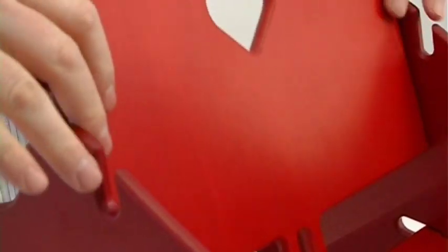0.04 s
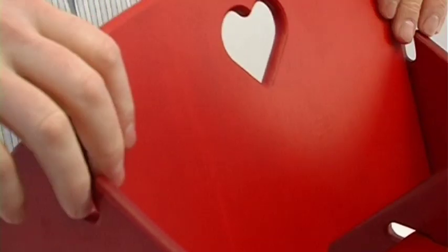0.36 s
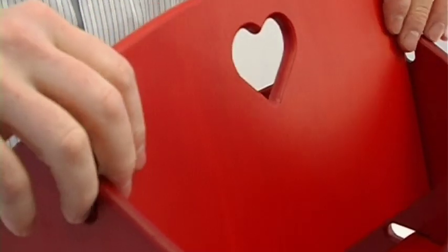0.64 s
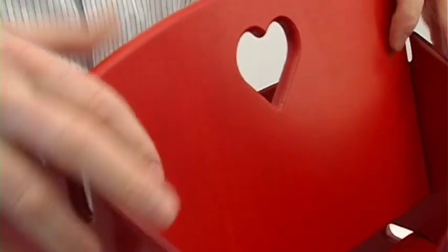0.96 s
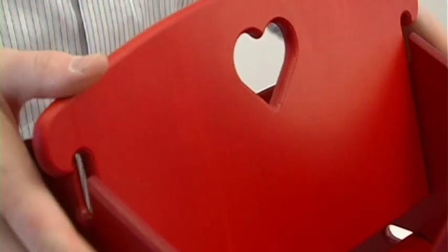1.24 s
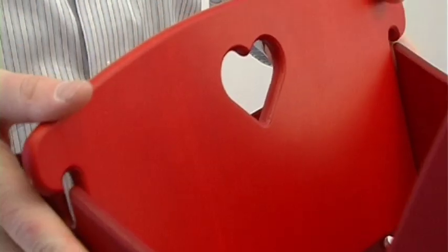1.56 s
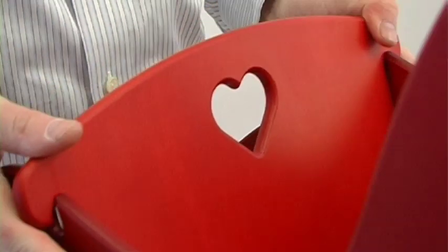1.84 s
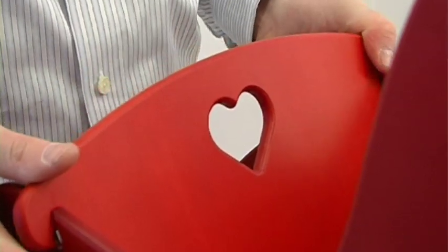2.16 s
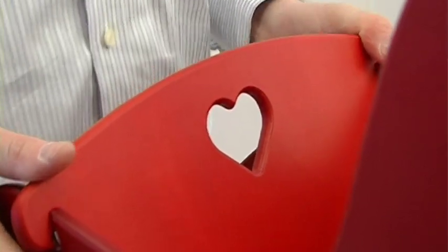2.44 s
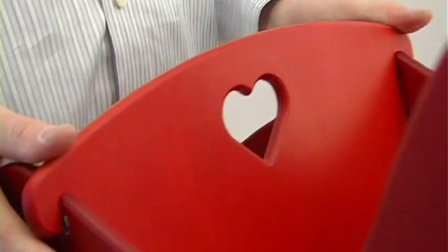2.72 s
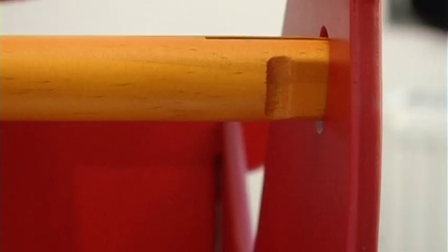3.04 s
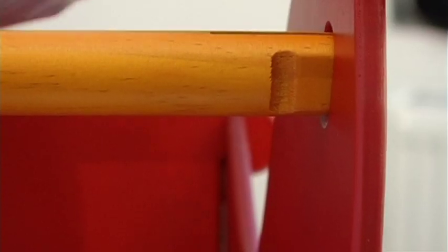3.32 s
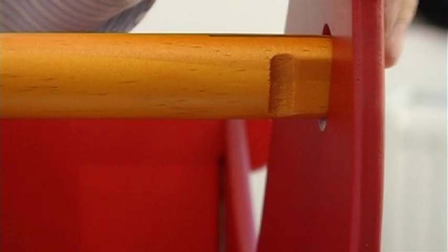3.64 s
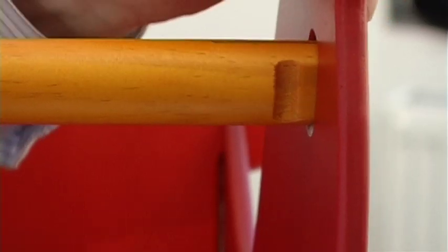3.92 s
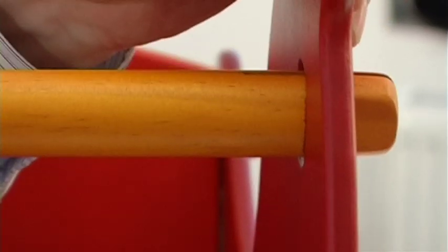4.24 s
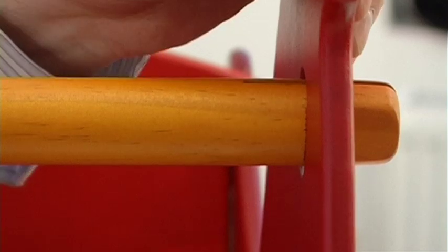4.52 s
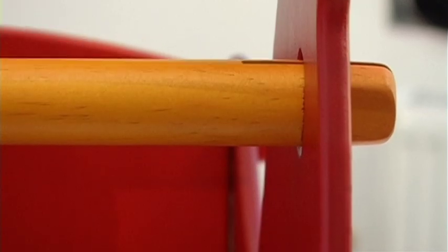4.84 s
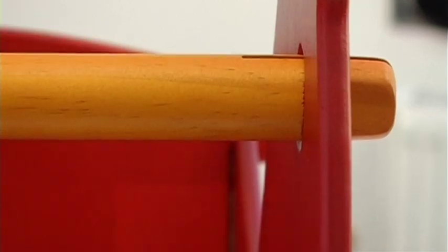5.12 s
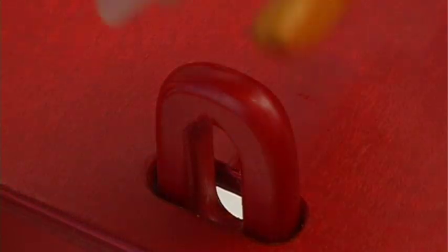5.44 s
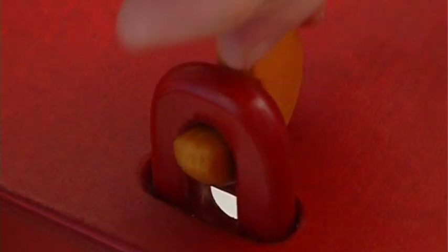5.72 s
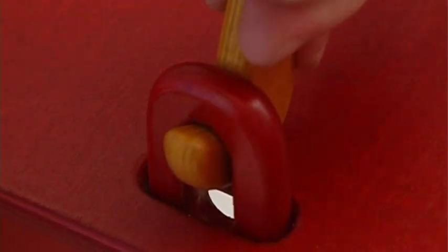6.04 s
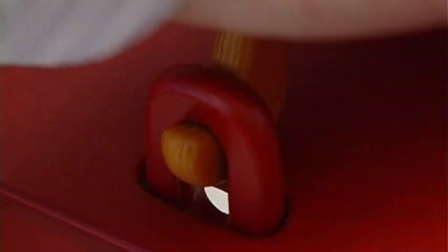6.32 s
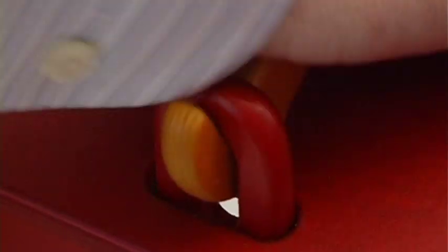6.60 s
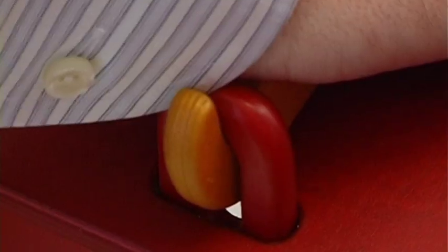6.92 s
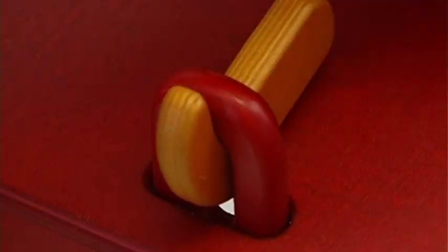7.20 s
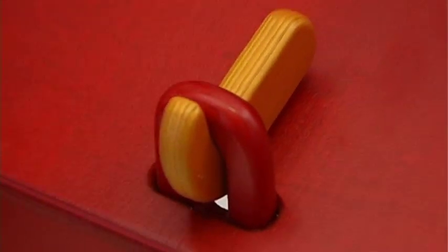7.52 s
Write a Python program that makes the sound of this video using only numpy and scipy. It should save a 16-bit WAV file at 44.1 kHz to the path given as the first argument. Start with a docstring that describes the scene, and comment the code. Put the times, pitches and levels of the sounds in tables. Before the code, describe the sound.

Wooden furniture is fitted together by hand, close to the microphone in a small, quiet room with faint hiss and hum. Soft sliding opens, then a double knock comes at about 0.6 seconds and light panel taps follow between 1 and 1.4 seconds. At 1.7 seconds slotted panels meet with a short scrape and a hollow, briefly ringing knock. Quiet rubbing and a faint low rocking continue to about 3 seconds. Small taps and clicks from 3.7 seconds lead to the loudest sound at 4.1 seconds, a hard, slightly overloaded crack as a dowel is knocked through. A faint tap follows at 4.7 seconds. A wedge goes in with two knocks around 5.6 seconds, then light taps and scrapes until 6.2. It jams home with a loud, sharp snap at 6.6 seconds. Soft rubbing and a couple of small clicks trail off by 8 seconds.

```python
"""Knocks on painted plywood, as furniture is put together by hand in a small, quiet room.
Slotted panels tap together, a dowel is knocked through, and a wedge is set and pressed home: each
impact excites the damped modes of the part, the joined boards and the bench. Between blows, sliding
wood rubs and hisses, edges click and the assembly rocks, over faint room noise and hum.
The loudest blow overloads the close microphone."""
import sys
import numpy as np
from scipy import signal
from scipy.fft import rfft, irfft, next_fast_len
from scipy.io import wavfile
from scipy.ndimage import uniform_filter1d

SR = 44100
rng = np.random.default_rng(int(sys.argv[2]) if len(sys.argv) > 2 else 0)


def log_audio(samples):
    """Write samples as a 16-bit WAV file to the path given in sys.argv[1]."""
    # one column per channel
    frames = np.atleast_2d(samples).T
    # limit to full scale, then quantise
    limited = np.clip(frames, -1, 1)
    pcm = np.round(limited * 32767).astype(np.int16)
    wavfile.write(sys.argv[1], SR, pcm)


N = 342216
CLOCK = np.arange(N) / SR  # seconds through the scene
T = np.arange(int(.7 * SR)) / SR  # seconds through one event

# spectrum of the crack of wood on wood: frequency_hz, density_db
CRACK_SPECTRUM = [(900, -16.5), (1900, -2), (3200, -1.5), (4300, -10.5), (6000, -1), (8000, -16),
                  (15000, -18.5)]


def amp(db):
    """Amplitude ratio of a level in decibels."""
    return 10 ** (np.asarray(db) / 20)


def unit(x):
    """Normalisation to rms 1."""
    return x / np.sqrt(np.mean(x ** 2) + 1e-20)


def crest(x):
    """Normalisation to peak 1."""
    return x / (np.abs(x).max() + 1e-12)


def along(points, hz):
    """Interpolation on a logarithmic frequency axis."""
    f, v = np.transpose(points)
    return np.interp(np.log(hz + 1), np.log(f), v)


def filtered(x, response):
    """Linear filtering: the spectrum times a frequency response."""
    n = x.shape[-1]
    m = next_fast_len(n + 8192)
    return irfft(rfft(x, m) * response(np.fft.rfftfreq(m, 1 / SR)), m)[..., :n]


def coloured(x, spectrum):
    """Spectral shaping, at rms 1."""
    return unit(filtered(x, lambda hz: amp(along(spectrum, hz))))


def rolled_off(x, hz, kind):
    """A causal second-order low-pass or high-pass."""
    return signal.sosfilt(signal.butter(2, hz, kind, fs=SR, output="sos"), x)


def resonance(hz, centre_hz, width_hz):
    """Frequency response of a driven, damped oscillator."""
    return 1j * hz * width_hz / (centre_hz ** 2 - hz ** 2 + 1j * hz * width_hz)


def add(track, start_s, sound):
    """Superposition of a sound on a track."""
    i = max(round(start_s * SR), 0)
    track[..., i:i + sound.shape[-1]] += sound[..., :N - i]


def fade(t60):
    """Exponential decay of 60 dB in t60 seconds."""
    return np.exp(-np.log(1000) * T / t60)


def swells(rows):
    """Incoherent addition: envelopes that rise and fall 20 dB in the given times sum in power."""
    return np.sqrt(sum(amp(db - 20 * np.maximum((s - CLOCK) / rise, (CLOCK - s) / fall)) ** 2
                       for s, db, rise, fall in rows))


def diffuse(size):
    """Diffuse-field noise: two close capsules are coherent only at long wavelengths."""
    # likeness of left and right: frequency_hz, coherence
    coherence = [(100, 0.98), (750, 0.94), (1400, 0.73), (2600, 0.49), (5000, 0.3), (12000, .03)]
    angle = lambda hz: np.arccos(along(coherence, hz)) / 2
    noise = rng.standard_normal((2, size))
    mid, side = filtered(noise, lambda hz: np.array([np.cos(angle(hz)), np.sin(angle(hz))]))
    return np.array([mid + side, mid - side])


def evened(tail):
    """Spectral smoothing: a furnished room favours no single tone."""
    spectrum = rfft(tail, 65536)
    power = np.mean(np.abs(spectrum) ** 2, axis=0)
    narrow, wide = (np.abs(uniform_filter1d(power, bins)) + 1e-9 for bins in (45, 300))
    return irfft(spectrum * np.sqrt(wide / narrow))[:, :len(T)]


def in_room(x, wet_db, build_s=0.005):
    """Reverberation: direct sound plus a diffuse tail that builds up as the walls reflect."""
    # reverberation time: frequency_hz, t60_s
    decay_times = [(80, 0.93), (300, 0.42), (1500, 0.51), (5000, 0.4), (8000, 0.45), (14000, 0.24)]
    # sound returned by the walls: frequency_hz, gain_db
    walls = [(80, -1.5), (400, 3.5), (1500, 2), (3500, 1.5), (6500, 1.5), (9000, -2), (13000, -14.5)]
    hz, t, bands = signal.stft(diffuse(len(T)), SR, nperseg=256)
    decay = np.exp(-np.log(1000) * t / along(decay_times, hz)[:, None]) * amp(along(walls, hz))[:, None]
    tail = evened(signal.istft(bands * decay, SR, nperseg=256)[1])
    tail *= 1 - np.exp(-(T / build_s) ** 2)
    return x + amp(wet_db - 33) * signal.fftconvolve(np.atleast_2d(x), tail, axes=1)[:, :x.shape[-1]]


def background(floor_db=-68):
    """Noise floor: still room air, microphone hiss and faint electrical tones."""
    # air and hiss: frequency_hz, density_db
    floor = [(12, -26), (20, -15), (59, -17), (160, -7.5), (347, -10.5), (470, -13), (555, -12), (603, -23),
             (693, -11.5), (889, -19), (1270, -19.5), (1730, -22), (1930, -23), (4310, -26), (15000, -24)]
    # mains hum and electronic whine: pitch_hz, rms_db
    hum = [(48.5, -76), (350, -80), (673, -85), (15625, -79.5)]
    tones = sum(amp(db) * np.sqrt(2) * np.sin(2 * np.pi * (hz * CLOCK + rng.random())) for hz, db in hum)
    return amp(floor_db) * coloured(diffuse(N), floor) + tones


def friction(spectrum, rough):
    """Friction noise: countless small slips of uneven strength, filtered by the wood."""
    strength = np.repeat(np.exp(rough * rng.standard_normal(N // 128 + 1)), 128)[:N]
    return coloured(strength * rng.standard_normal(N), spectrum)


def rocking(sway_hz=77.5, half_width_hz=6):
    """Forced vibration: the pushed assembly rumbles on the bench and sways at its lowest resonance."""
    # pushes of the hands: peak_s, rumble_db, sway_db, rise_s, fall_s
    pushes = [(.77, -57.5, -59.5, 0.28, 0.15), (1.22, -57, -54.5, 0.35, 0.46),
              (2.15, -58.5, -66.5, 1, 0.53), (2.73, -52, -53.5, 0.21, 0.18),
              (3.73, -48.5, -65, 0.052, 0.018), (3.99, -56, -62, 0.29, 0.22),
              (6.07, -53.5, -55.5, 0.46, 0.23), (6.46, -54.5, -53.5, 0.12, 0.32),
              (6.73, -51, -45, 0.11, 0.14), (7.17, -59.5, -73, 0.12, 0.44)]
    # rumble on the bench: frequency_hz, density_db
    spectrum = [(29, -32), (50, -8), (59, -14), (76, -5.5), (102, -10.5), (129, -3), (156, -12.5),
                (195, -1.5), (260, -7.5), (340, -39), (570, -120)]
    rumble = swells([(s, db, rise, fall) for s, db, _, rise, fall in pushes])
    rumble *= friction(spectrum, rough=0.34)
    sway = swells([(s, db, rise, fall) for s, _, db, rise, fall in pushes])
    lowest_mode = lambda hz: 1 / (1 + ((hz - sway_hz) / half_width_hz) ** 2)
    sway *= unit(filtered(rng.standard_normal(N), lowest_mode))
    return rolled_off(rumble, hz=50, kind="high") + sway


def sliding(wood_db=-4, sing_db=-7, hiss_db=-3, hiss_growth=1.25):
    """Sliding friction drives the panels' resonances; hiss grows more steeply with speed than rubbing."""
    # one part slides along another: peak_s, rub_db, hiss_db, rise_s, fall_s
    strokes = [(0.019, -47, -54.5, 0.16, 0.22), (0.39, -54, -65, 0.6, 0.41), (1.704, -44, -56, 0.07, 0.087),
               (1.97, -52, -61.5, 0.19, 0.35), (2.65, -53.5, -63, 0.21, 0.22),
               (3.919, -47.5, -60.5, 0.062, 0.17), (4.02, -46, -48.5, .06, .12),
               (6.0, -62, -74, 0.84, 0.21), (6.2, -48, -68, 0.07, 0.075), (6.479, -60, -73.5, 0.38, 0.17),
               (6.75, -45, -77, 0.1, 0.058), (7.14, -55.5, -85, 0.055, 0.18), (7.68, -63.5, -69, 0.28, .18)]
    # a tight joint gives way: peak_s, level_db, rise_s, fall_s
    slips = [(1.704, -48.5, 0.023, 0.02), (1.723, -45, 0.024, 0.037), (2.585, -67, 0.023, 0.36),
             (4.088, -47, 0.016, 0.0091), (5.618, -57, 0.032, 0.029), (6.218, -51.5, 0.062, 0.03),
             (7.18, -70, 0.094, .12)]
    # resonances of a rubbed panel: centre_hz, width_hz, gain_db
    modes = [(355.7, 45, -0.5), (510, 32, 1), (823, 13, -7), (1057, 22, -9.5), (1349, 34, -11),
             (1960, 45, -11), (2700, 130, -21.5)]
    # spectra of the three friction noises: frequency_hz, density_db
    rub_spectrum = [(120, -35), (200, 1), (286, -8), (333, 1.5), (424, -3), (490, -6.5), (629, -6.5),
                    (741, -5.5), (1070, -10), (1180, -20.5), (1280, -10), (1800, -39), (2000, -29),
                    (2600, -48.5), (4400, -120)]
    hiss_spectrum = [(880, -41), (1500, -7), (1960, -8), (2380, -15.5), (3450, -13.5), (4310, -24.5),
                     (6060, -19), (10000, -41), (13000, -61), (22000, -120)]
    swish_spectrum = [(600, -18.5), (1200, 6), (3300, 10), (4400, -3), (6000, 5), (9000, -3),
                      (15000, -18.5)]
    rubbing = swells([(s, db, rise, fall) for s, db, _, rise, fall in strokes])
    hissing = swells([(s, db, rise / hiss_growth, fall / hiss_growth) for s, _, db, rise, fall in strokes])
    panel = lambda hz: sum((-1) ** k * amp(db) * resonance(hz, centre, width)
                           for k, (centre, width, db) in enumerate(modes))
    singing = unit(filtered(rng.standard_normal(N), panel))
    wood = rubbing * (amp(wood_db) * friction(rub_spectrum, rough=0.36) + amp(sing_db) * singing)
    hiss = amp(hiss_db) * hissing * friction(hiss_spectrum, rough=0.3)
    swish = swells(slips) * friction(swish_spectrum, rough=0.6)
    return in_room(wood + hiss, wet_db=-4) + in_room(swish, wet_db=-6)


def ticks():
    """Transient excitation: edges snap past each other, sending a noise burst through one resonance."""
    # edges catching: start_s, level_db, pitch_hz, t60_s, quality_factor
    catches = [(1.359, -39.5, 1050, 0.075, 4), (1.715, -44, 3540, 0.036, 17),
               (2.064, -44, 1940, 0.016, 0.77), (3.087, -56, 2400, 0.014, 1.1),
               (3.876, -41.5, 1310, 0.077, 1.9), (4.002, -34, 1820, 0.11, 1.64),
               (5.232, -54, 3476, 0.26, 3.6), (5.234, -53, 6900, 0.22, 3.3),
               (5.528, -38.5, 2370, 0.17, 3.7), (5.611, -28, 610, 0.042, 2.1),
               (6.156, -39, 1730, 0.023, 0.78), (6.171, -37, 625, 0.05, 5), (6.215, -59, 3020, .1, 10),
               (7.093, -46, 1170, 0.073, 4), (7.325, -55.5, 8830, 0.057, 1.6)]
    out = np.zeros(N)
    for s, db, centre, t60, quality in catches:
        burst = rng.standard_normal(len(T)) * fade(t60)
        tick = filtered(burst, lambda hz: resonance(hz, centre, centre / quality) ** 2)
        add(out, s, amp(db) * crest(tick))
    return in_room(out, wet_db=-6)


def ring(modes, lo=0, hi=np.inf, pitch=1, rattle=0, grip=0.0066):
    """Free vibration: damped modes of alternating sign, detuned by the grip at each blow."""
    tuning = pitch * (1 + rng.normal(0, grip, len(modes)))
    out = np.zeros(len(T))
    for k, (hz, db, t60) in enumerate(modes):
        if lo <= hz < hi:
            phase = 2 * np.pi * hz * tuning[k] * T
            if rattle:  # a chattering joint smears the mode over this share of its frequency
                phase += np.cumsum(rng.standard_normal(len(T))) * np.sqrt(2 * np.pi * rattle * hz / SR)
            out += (-1) ** k * amp(db) * fade(t60) * np.sin(phase)
    return out


def knocks(hits, modes, ring_db, clatter, crack_db, thud_db, crack_t60, grain, contact_hz, wet_db,
           colour=CRACK_SPECTRUM, split_hz=1800):
    """Impact excitation of part, boards and bench; ring_db, crack_db and thud_db offset the hit levels."""
    # joined boards around the part: frequency_hz, density_db
    board_spectrum = [(100, -23), (180, -6.5), (270, -5), (420, 3), (750, 0.5), (1400, -8.5), (2200, -20.5),
                      (4000, -50.5)]
    # modes of the whole assembly on the bench: pitch_hz, level_db, t60_s
    bench_modes = [(76.7, -1.5, 0.23), (131, -3, 0.24), (183.4, -5.5, 0.32)]
    out = np.zeros((2, N))
    for s, level, crack, push, pitch in hits:
        body = crest(rolled_off(ring(modes, hi=split_hz, pitch=pitch), hz=2070, kind="low"))
        boards = coloured(rng.standard_normal(len(T)), board_spectrum) * fade(t60=0.085)
        boards = crest(rolled_off(boards, hz=2480, kind="low"))
        dense = crest(coloured(diffuse(len(T)), colour) * fade(crack_t60))  # countless short high modes
        upper = crest(ring(modes, lo=split_hz, pitch=pitch, rattle=0.018)) + grain * dense
        upper = crest(rolled_off(upper, contact_hz, "low"))  # a longer contact is duller
        thud = ring(bench_modes) * (1 - np.exp(-T / 0.039))  # the heavy assembly is slow to move
        thud = crest(rolled_off(thud, hz=60, kind="high"))
        part = amp(level + ring_db) * body + amp(crack + crack_db) * upper
        # the microphone is close to the part, but the large boards radiate mostly into the room
        around = amp(level) * clatter * in_room(boards, wet_db=4)
        add(out, s, in_room(part, wet_db) + around + amp(push + thud_db) * thud)
    return out


def panel_taps():
    """Light impacts excite the low modes of a panel."""
    # contacts: start_s, level_db, crack_db, thud_db, pitch_ratio
    hits = [(0.953, -33.5, -71, -66, 0.94), (1.159, -37, -67, -66, 0.96), (1.29, -37.5, -66, -65, 1.01),
            (1.357, -32, -74, -61, 1.044), (3.669, -40.5, -53, -47, 0.94), (3.909, -49.5, -54.5, -60.5, 1),
            (4.718, -46, -59, -53, 0.97), (4.754, -48.5, -75, -65, 1.1)]
    # panel modes: pitch_hz, level_db, t60_s
    modes = [(286, -6.5, 0.018), (313, -8, 0.062), (399.3, 1, 0.18), (520, 1, 0.085), (642, -6, 0.11),
             (820, -11.5, 0.07), (950, -18, 0.1), (1116, -13.5, 0.083), (1290, -24, 0.08)]
    return knocks(hits, modes, ring_db=4.5, clatter=0.26, crack_db=6, thud_db=-1,
                  crack_t60=0.15, grain=0.6, contact_hz=4000, wet_db=-5)


def frame_knocks():
    """A double impact sets the frame in damped vibration."""
    # contacts: start_s, level_db, crack_db, thud_db, pitch_ratio
    hits = [(0.563, -24.5, -45.5, -49, 0.97), (0.62, -32, -51, -45, 0.91)]
    # frame modes: pitch_hz, level_db, t60_s
    modes = [(192, -0.5, 0.064), (360, -0.5, 0.059), (526, -11.5, 0.21), (531, 2, 0.0083), (769, -5, 0.068),
             (965, -9, 0.039), (1310, -9.5, 0.058), (1740, -14, 0.053), (2284, -11.5, 0.0086),
             (2504, -21, 0.08), (2870, -31, 0.079), (3520, -29.5, 0.09)]
    return knocks(hits, modes, ring_db=0.5, clatter=0.2, crack_db=7, thud_db=3.5,
                  crack_t60=0.067, grain=0.79, contact_hz=4360, wet_db=-5.5)


def slot_knock():
    """Slotted panels meet, and their lightly damped low modes ring on."""
    # contact: start_s, level_db, crack_db, thud_db, pitch_ratio
    hits = [(1.709, -19.5, -43, -40, 0.99)]
    # modes of the slotted panels: pitch_hz, level_db, t60_s
    modes = [(139.6, -9, 0.47), (198, 2, 0.16), (337, -10.5, 0.19), (393, -5.5, 0.22), (477, -4.5, 0.06),
             (711, -6, 0.17), (793, -1.5, 0.087), (1264, -10, 0.13)]
    return knocks(hits, modes, ring_db=-0.5, clatter=0.082, crack_db=7.5, thud_db=4.5,
                  crack_t60=0.063, grain=0.6, contact_hz=6000, wet_db=-10.5)


def wedge_taps():
    """The wedge is set: long contacts put little energy into the treble."""
    # contacts: start_s, level_db, crack_db, thud_db, pitch_ratio
    hits = [(5.528, -26, -59, -79.5, 1.085), (5.624, -17.5, -30, -44.5, 1.026), (5.889, -49, -75, -57, 1.2),
            (5.909, -38, -62, -65, 0.93), (5.971, -37, -57, -60, 0.99), (6.045, -38.5, -65, -46, 0.98),
            (6.088, -43, -65, -70, 0.99), (6.12, -39.5, -67, -72, 1.02), (6.171, -42, -51, -45, 0.95)]
    # modes of the loose wedge: pitch_hz, level_db, t60_s
    modes = [(336.4, 0.5, 0.2), (477, -0.5, 0.15), (577, 3.5, 0.044), (642, 4, 0.04), (854, -8, 0.083),
             (1041, -11.5, 0.11), (1310, -15, 0.11), (1550, -22.5, 0.16), (2016, -15, 0.057),
             (2340, -13, 0.03), (2840, -10, 0.044), (3270, -14, 0.039)]
    return knocks(hits, modes, ring_db=-1.5, clatter=0.1, crack_db=3, thud_db=-4.5,
                  crack_t60=0.088, grain=0.36, contact_hz=3000, wet_db=-7)


def wedge_seating():
    """The wedge jams home: a short contact gives a broadband snap."""
    # contacts: start_s, level_db, crack_db, thud_db, pitch_ratio
    hits = [(6.556, -11, -20.5, -23, 1), (6.641, -31, -50, -70, 1), (7.093, -42.5, -61, -67, 1.04)]
    # modes of the wedge tight in its eye: pitch_hz, level_db, t60_s
    modes = [(208, -3.5, 0.078), (236, 0.5, 0.036), (335.3, 0, 0.18), (473, -1, 0.07), (629, 0.5, 0.041),
             (800, -13, 0.047), (926, -11.5, 0.12), (1088, -14, 0.031), (1318, -21.5, 0.072),
             (1584, -33, 0.056), (2034, -14, 0.046), (2536, -15, 0.021), (3210, -7, 0.014)]
    # snap of jamming: frequency_hz, density_db
    snap = [(900, -22), (1900, -7.5), (3200, 1), (4300, -6.5), (6000, 3), (8000, -15.5), (11000, -15.5),
            (15000, -15.5)]
    return knocks(hits, modes, ring_db=0, clatter=0.04, crack_db=3, thud_db=-10,
                  crack_t60=0.044, grain=2.46, contact_hz=13900, wet_db=-6.5, colour=snap)


def dowel_blows():
    """The dowel is knocked through a side panel: a hard, brief impulse excites a wide band of modes."""
    # contacts: start_s, level_db, crack_db, thud_db, pitch_ratio
    hits = [(3.979, -46, -63, -57, 1), (4.002, -33, -46.5, -58.5, 0.95), (4.094, -1, -18, -33.5, 1),
            (4.098, -25, -23, -59.5, 0.95)]
    # modes of the struck dowel: pitch_hz, level_db, t60_s
    modes = [(339, -14, 0.074), (401, -2.5, 0.055), (484.4, -5.5, 0.036), (715, 0, 0.03), (819, -6, .035),
             (950, -18.5, 0.1), (1100, -8.5, 0.032), (1335, -9, 0.066), (1508, -7, 0.015),
             (1600, -15, 0.095), (1700, -12, 0.036), (1930, -19, 0.017), (2250, -15, 0.02),
             (2520, -16.5, 0.026), (2850, -20, 0.02)]
    return knocks(hits, modes, ring_db=1, clatter=0.31, crack_db=9, thud_db=-0.5,
                  crack_t60=0.025, grain=0.94, contact_hz=14160, wet_db=-3.5)


def scene():
    """Superposition of all sources; a level difference places the work slightly to the right."""
    impacts = frame_knocks() + panel_taps() + slot_knock() + dowel_blows() + wedge_taps() + wedge_seating()
    return (impacts + ticks() + sliding() + rocking()) * amp([[-.3], [.3]]) + background()


def record(dry, ceiling=0.64, knee=5, top_hz=15850):
    """Saturation in the input stage rounds off the loudest peaks; nothing passes above the band limit."""
    clipped = dry / (1 + np.abs(dry / ceiling) ** knee) ** (1 / knee)
    return filtered(clipped, lambda hz: hz < top_hz)


dry = scene()
out = record(dry)
log_audio(out)
```